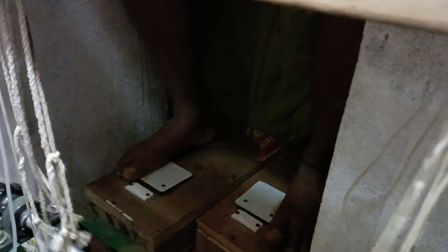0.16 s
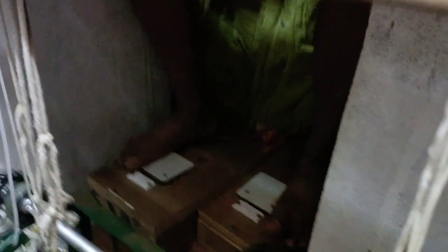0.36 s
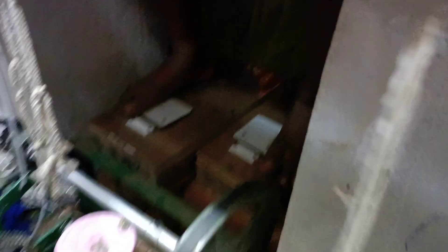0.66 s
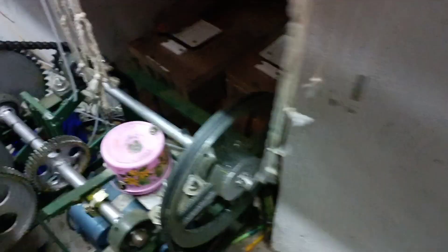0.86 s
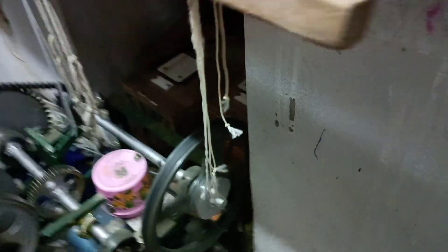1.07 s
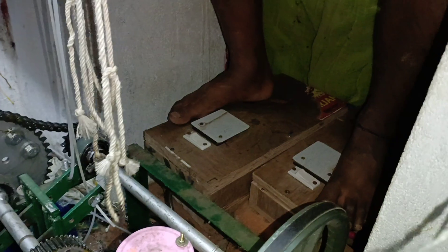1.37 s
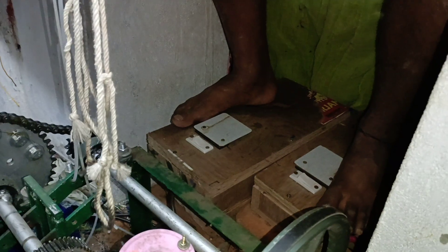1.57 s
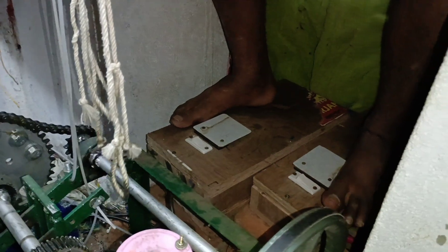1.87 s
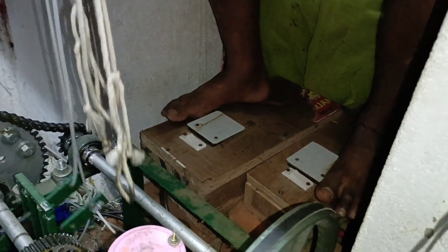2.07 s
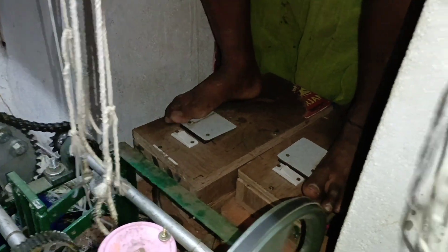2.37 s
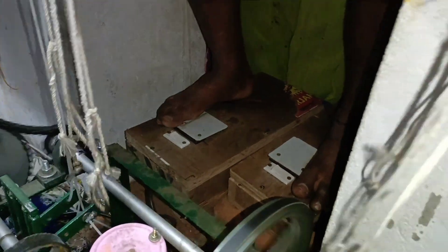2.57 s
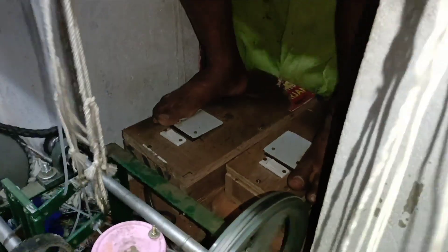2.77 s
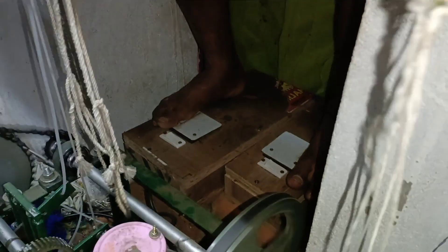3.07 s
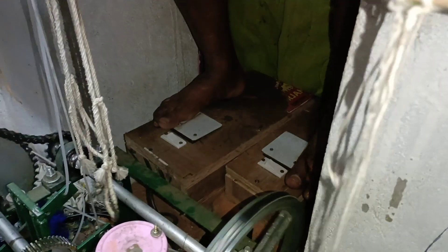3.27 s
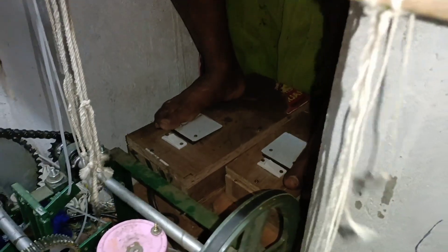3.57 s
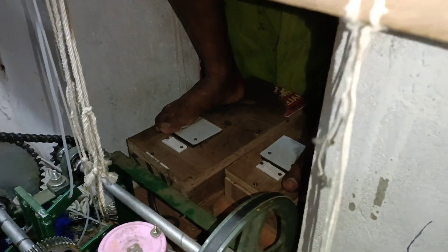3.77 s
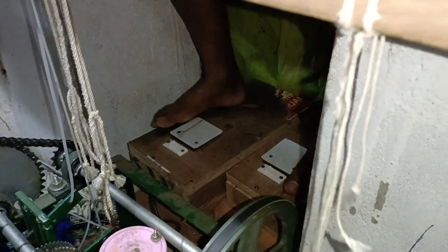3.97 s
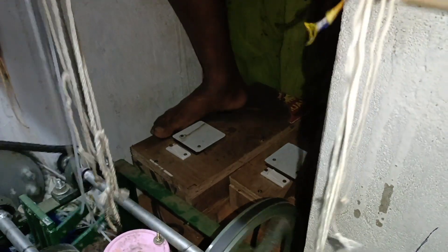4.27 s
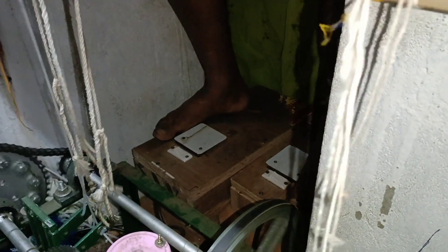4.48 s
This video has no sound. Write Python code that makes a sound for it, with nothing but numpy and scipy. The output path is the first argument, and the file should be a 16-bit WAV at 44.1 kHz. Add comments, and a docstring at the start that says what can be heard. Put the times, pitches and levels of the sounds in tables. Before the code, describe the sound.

Uneven wooden knocks from a foot-worked loom, heard very close with a short bright room echo. The first chain of clatter and hard blows is chopped off at an iron clack. Near silence holds a few tiny ticks, then rubbing and grinding swell, levers knock, and the second stroke lands, ending in clacks and a hissy scrape.

```python
"""A small hard-walled room, heard from close by: a wooden handloom is worked by its treadles.
A stroke is a chain of impacts: treadle clatter, latch, catch, batten blow and rebound, a pause, an iron clack.
The sound of the first stroke is cut off abruptly; near silence with faint ticks follows, then the loom runs up
with a long slide and makes a second stroke. Impacts excite decaying modes, gears grind under a varying load, cords
rub as friction noise and short thin tones squeak or ring. A look-ahead limiter ducks all around the hardest blows."""
import sys
import numpy as np
from scipy import signal
from scipy.io import wavfile
from scipy.ndimage import uniform_filter1d, minimum_filter1d

SR = 44100
rng = np.random.default_rng(int(sys.argv[2]) if len(sys.argv) > 2 else 0)


def store_pcm(level_fs):
    """Save levels as 16-bit WAV."""
    pcm = np.round(np.clip(level_fs, -1, 1) * 32767).astype(np.int16)
    wavfile.write(sys.argv[1], SR, np.atleast_2d(pcm).T)


N = 204359
TIME = np.arange(N) / SR  # s
BREAK_S = 1.398  # the sound of the first stroke, with all its echoes, is cut off here
FIRST_STROKE_S, SECOND_STROKE_S = 0, 2.985
HISS_DB, HISS_GROWTH = -7, 1.3  # cord hiss at a gear load of 0 dB, and dB of hiss per dB of load
GRIP_S = .018  # a rub takes this long to reach full pressure
TONE_SAG = .02  # share of its pitch that a thin tone loses as it runs
EDGE_HZ = 15750  # upper band limit

# Load on the loom through any one stroke.
# Each row: time into the stroke in seconds, load on the frame in dB, load on the gears in dB.
STROKE_LOAD = [(0, -35.5, -31), (.16, -28.5, -24.5), (.3, -28.5, -30), (.4, -45, -39.5), (.52, -35.5, -32),
               (.6, -38.5, -37), (.72, -40, -26.5), (.84, -42.5, -35.5), (1.06, -43.5, -36.5),
               (1.23, -35.5, -33.5), (1.41, -34, -24), (1.65, -32, -28)]
# Load from the near silence after the cut through the run-up to the second stroke.
# Each row: time in seconds, load on the frame in dB, load on the gears in dB.
RUN_UP_LOAD = [(1.41, -65, -64), (1.55, -45.5, -54.5), (1.71, -60, -66), (1.85, -46, -41),
               (2.0, -38, -24.5), (2.2, -32, -21), (2.58, -36, -34), (2.68, -30.5, -22.5),
               (2.77, -44, -29.5), (2.85, -28, -22.5)]
# Spectrum of the loaded frame's rumble. Each row: frequency in Hz, level in dB.
RUMBLE_SPECTRUM = [(25, -21), (40, -17), (58, 0.5), (100, -2.5), (170, 2.5), (212, -9.5), (245, -3.5),
                   (305, -5), (440, -10), (600, -28), (1000, -72)]
# Spectrum of the grinding gear teeth. Each row: frequency in Hz, level in dB.
GRIND_SPECTRUM = [(150, -12), (400, -1), (750, 4.5), (1300, -0.5), (2000, -2), (2800, -4.5), (3500, -15),
                  (5000, -26.5), (9000, -55)]
# Spectrum of the hissing cords. Each row: frequency in Hz, level in dB.
HISS_SPECTRUM = [(2000, -18.5), (4000, 0.5), (5500, -1), (7000, -1.5), (8700, 3), (10300, -6), (12500, -20),
                 (15500, -18)]
# Blows of the loom's parts. Each row: start in seconds, force in dB, treble tilt in dB, part struck.
BLOWS = [ (.094, -25, -2, "treadle"), (.113, -18, 1.5, "treadle"), (.142, -8, -.5, "treadle"),
         (.175, -7.5, -3, "treadle"), (.191, -13, 0, "treadle"), (.269, -12, 2.5, "latch"),
         (.3414, 3, 4, "catch"), (.626, -1.5, -4.5, "batten"), (.712, -11, -20, "rebound"),
         (.776, -19, -15, "rebound"), (.891, -28, -9, "batten"), (.918, -18.5, -7, "batten"),
         (1.2665, -32.5, 10, "clack"), (1.338, -10, 10, "clack"), (1.369, -19, -1, "clack"),
         (1.4272, -48.5, 4, "fitting"), (1.506, -40.5, 10, "fitting"), (1.554, -41, 7, "fitting"),
         (1.7348, -51, -1, "fitting"), (1.767, -34.5, -1, "fitting"), (2.448, -22.5, -8, "latch"),
         (2.493, -24, 3, "latch"), (2.6243, -20.5, -19, "rebound"), (2.644, -7, -5, "pawl"),
         (2.801, -15, 0.5, "lever"), (2.808, -10.5, 0.5, "lever"), (2.837, -13, -1, "lever"),
         (2.951, -27.5, 3, "fitting"), (2.976, -20, -8, "box"), (3.117, -7.5, -4.5, "treadle"),
         (3.162, -11.5, -1, "treadle"), (3.2551, -9.5, -2, "latch"), (3.333, 3.5, 3.5, "catch"),
         (3.6075, -2, 2.5, "batten"), (3.689, -7.5, -13, "rebound"), (3.904, -25.5, 0, "batten"),
         (3.9157, -17, -14, "batten"), (4.329, -19, -9, "rebound"), (4.3435, -9.5, 7.5, "clack"),
         (4.415, -11.5, 2.5, "box"), (4.612, -14.5, -6, "latch")]
# How each struck part sounds. Each entry: bass tilt in dB, clatter time in seconds, room level in dB,
# iron ring in dB, own note in Hz, level of that note in dB.
STRUCK_PARTS = {"treadle": (2, .0058, 0.5, -5, 1640, -6), "latch": (-8, .003, 5.5, -12, 2170, -4),
                "catch": (-6, .0023, 1.3, -15, 1850, -9), "batten": (-5, .0095, 2, -28, 1160, -3.5),
                "rebound": (-4, .007, -2, -22, 1580, -4), "clack": (-3, .0085, 0.5, -5, 3160, -6),
                "fitting": (-7, .003, 2, -5, 2400, 3), "pawl": (-1, .013, -14, -16, 3450, -7),
                "lever": (3, .004, 3.5, 1.5, 1880, -6), "box": (7, .007, -10, -12, 340, -6)}
# Response of the wood. Each row: frequency in Hz, level in dB.
WOOD_RESPONSE = [(30, -44), (130, -21), (300, -4.5), (600, -3.5), (1000, -2), (1700, 1), (2800, 0.5),
                 (3600, -8.5), (4600, -12), (6200, -10), (8400, -10.5), (10300, -20.5), (12500, -30),
                 (15500, -37.5)]
# Modes of the frame. Each row: frequency in Hz, level before scatter in dB, 60 dB decay time in seconds.
FRAME_MODES = [(179, -7.5, 0.077), (234, -17, 0.097), (351, 0.5, 0.14), (865, 15, .09), (1186, 11, 0.088),
               (1540, 7.5, .1), (1840, 16, 0.063), (2760, -10, 0.12), (2993, 16, 0.08), (3500, 7, 0.14),
               (3750, -4, 0.059), (6430, -3.5, .09), (7650, -24, .08), (8500, -60, .08)]
# Modes of the iron fittings. Each row: frequency in Hz, level before scatter in dB, 60 dB decay time in seconds.
IRON_MODES = [(1025, -6, 0.19), (2210, -4, 0.21), (2556, -1.5, 0.62), (2760, 4, .22), (3230, -26, 0.072),
              (3350, 3, 0.11), (4080, 7, 0.06), (5330, -2, .26), (5500, -1, .22), (5400, -8, 0.12),
              (6050, -4, .15), (7100, -7.5, .24), (7100, -8, 0.35), (9120, -20.5, .2), (10700, -38.5, .18)]
# Close modes of a struck part.
# Each row: multiple of its own note, level before scatter in dB, 60 dB decay time in seconds.
NOTE_MODES = [(.965, -6.5, 0.071), (1, -1, .12), (1.04, -1, 0.083)]
# Decay of the room. Each row: frequency in Hz, 60 dB decay time in seconds.
ROOM_DECAY = [(100, 0.22), (500, 0.34), (1500, 0.47), (3000, 0.44), (8000, 0.27), (15000, 0.3)]
# Booms of the treadles and their box under the feet.
# Each row: start in seconds, mean frequency in Hz, level in dB, swell time in seconds.
BOOMS = [(.134, 181, -24.5, .043), (.2, 247, -31.5, .024), (.224, 129, -29, .036), (.519, 130, -31, .027),
         (.555, 73.4, -34, .025), (1.472, 165, -41.5, .028), (2.57, 58.7, -28, .035),
         (2.811, 144, -27.5, .013), (3.105, 426, -26, .031), (3.136, 360, -24, .021),
         (3.15, 243.4, -24.5, .021), (3.165, 130.6, -27, .043), (3.264, 67.6, -28, .014),
         (3.615, 245, -27, .012), (4.4, 339, -17, .01)]
# Cords and sliding wood.
# Each row: start in seconds, time under pressure in seconds, fade time in seconds, level in dB, treble tilt in dB.
RUB_EVENTS = [(.2, .035, .015, -34, 7), (.48, .05, .04, -28, 1), (1.12, .04, .05, -43, 9),
              (1.4, .1, .03, -57, 5), (1.499, .08, .015, -47.5, 9), (1.907, .11, .04, -27, 3),
              (2.021, .07, .04, -22.5, 2), (2.118, .13, .135, -21.5, 6.5), (2.149, .065, .025, -16.5, 7.5),
              (3.065, .035, .025, -24.5, 1), (3.133, .03, .03, -27, 6), (.63, .07, .04, -33, 7),
              (3.48, .06, .05, -36, 4), (4.121, .03, .015, -35.5, 7.5), (4.177, .02, .015, -32.5, 4),
              (4.389, .035, .015, -19.5, 3), (4.438, .05, .025, -13, 8.5), (4.53, .1, .05, -26.5, 6)]
# Colour of sliding contact. Each row: frequency in Hz, level in dB.
SLIDING_COLOUR = [(250, 2.5), (1000, 1.5), (3000, 4.5), (5600, -3), (8400, -0.5), (12000, 5.5), (15500, 9)]
# Short thin tones, squeaking or ringing. Each row: start in seconds, length in seconds, starting pitch in Hz,
# level in dB, unsteadiness as a share of pitch.
THIN_TONES = [(.498, .042, 8800, -30, .063), (.575, .066, 11800, -35.5, .044),
              (.906, .026, 7950, -34, .025), (1.91, .039, 9200, -34, .042), (3.008, .038, 9250, -44, .004),
              (3.112, .034, 1625, -17.5, .013), (3.274, .033, 1210, -21, .022),
              (3.566, .11, 11750, -37, .057), (3.617, .028, 8350, -12, .025),
              (3.902, .02, 7850, -31.5, .027), (4.125, .02, 7850, -33.5, .017),
              (4.18, .016, 7600, -32, .035)]


def amp(db):
    """Level to gain: twenty decibels are a factor of ten in amplitude."""
    return 10 ** (np.asarray(db) / 20)


def evened(x):
    """Normalisation of a steady signal: scales to rms 1."""
    return x / np.sqrt(np.mean(x ** 2) + 1e-20)


def unit(x):
    """Normalisation of a transient: scales to energy 1."""
    return x / (np.linalg.norm(x) + 1e-12)


def read(points, hz):
    """Interpolation on a pitch scale: joins points by straight lines over log frequency."""
    f, value = np.transpose(points)
    return np.interp(np.log(hz + 1), np.log(f + 1), value)


def add(mix, s, sound):
    """Superposition: adds a sound at time s; whatever began before the break ends there."""
    end = round(BREAK_S * SR) if s < BREAK_S else N
    part = mix[max(round(s * SR), 0):end][:len(sound)]
    part += sound[:len(part)]


def colour(x, *spectra, size=4096):
    """Minimum phase: a causal filter of energy 1 whose dB curve is the sum of the spectra."""
    hz = abs(np.fft.fftfreq(size, 1 / SR))
    gain_db = sum(read(points, hz) for points in spectra)
    log_gain = np.log(amp(gain_db))
    spectrum = np.exp(np.conj(signal.hilbert(log_gain)))  # the log gain fixes the phase
    taps = np.fft.ifft(spectrum).real
    return signal.fftconvolve(x, unit(taps[:size // 2]))[:len(x)]


def grains(count, spread_db):
    """Granular contact: dense tiny touches, a few much larger than the rest."""
    push = rng.standard_normal(count)
    touching = rng.random(count) < .25
    size = np.minimum(rng.exponential(1, count), 4)
    return evened(push * touching * amp(spread_db * size))


def wander(x, patchy_db=3.2):
    """Moving excitation: a travelling contact wakes one narrow resonance after another."""
    z = signal.stft(x, SR, nperseg=1024, noverlap=768)[2]
    across_hz = uniform_filter1d(rng.standard_normal(z.shape), size=4, axis=0)
    patches = evened(uniform_filter1d(across_hz, size=6, axis=1))  # smoothed over time too
    moved = signal.istft(z * amp(patchy_db * patches), SR, nperseg=1024, noverlap=768)[1]
    return evened(moved[:len(x)])


def stroke_at(start):
    """Time shift: the load curve of a stroke that begins at this time."""
    return [(start + s, frame_db, gear_db) for s, frame_db, gear_db in STROKE_LOAD]


def mechanism():
    """Friction under load: the frame rumbles, gear teeth grind unevenly and cords hiss along with the gears."""
    out = np.zeros(N)
    spans = ((stroke_at(FIRST_STROKE_S), 0, BREAK_S),
             (RUN_UP_LOAD + stroke_at(SECOND_STROKE_S), BREAK_S, N / SR))
    for load, start, stop in spans:
        t = TIME[round(start * SR):round(stop * SR)]
        s, frame_load, gear_load = np.transpose(load)
        frame_db = np.interp(t, s, frame_load)
        gear_db = np.interp(t, s, gear_load)
        rumble = amp(frame_db) * colour(rng.standard_normal(len(t)), RUMBLE_SPECTRUM, size=8192)
        teeth = wander(grains(len(t), spread_db=2.0), patchy_db=3.5)
        grind = amp(gear_db) * colour(teeth, GRIND_SPECTRUM)
        cords = wander(grains(len(t), spread_db=2), patchy_db=5)
        hiss = amp(HISS_DB + HISS_GROWTH * gear_db) * colour(cords, HISS_SPECTRUM)
        add(out, start, rumble + grind + hiss)
    return out


def tilt(bass_db, treble_db):
    """Contact stiffness: heavy contacts add bass, hard contacts add treble."""
    return [(250, bass_db), (1000, 0), (2600, 0), (5000, treble_db), (14000, 2.12 * treble_db)]


def ring(modes, t, scatter_db):
    """Modal decay: each blow lands elsewhere and shares its energy out differently among the modes."""
    hz, db, t60 = np.transpose(modes)[:, :, None]
    weight, detune, start = rng.standard_normal((3, len(modes), 1))
    swing = np.sin(2 * np.pi * (hz * (1 + 0.0035 * detune) * t + start))
    decay = np.exp(-np.log(1000) * t / t60)
    return unit((amp(db + scatter_db * weight) * decay * swing).sum(0))


def room(count, build_s=0.0031):
    """Diffuse reverberation: dense reflections build up quickly, then each band dies at its own rate."""
    hz, t, z = signal.stft(rng.standard_normal(count), SR, nperseg=256)
    decay = np.exp(-np.log(1000) * t / read(ROOM_DECAY, hz)[:, None])
    tail = signal.istft(z * decay, SR, nperseg=256)[1][:count]
    return unit(tail * (1 - np.exp(-TIME[:count] / build_s)))


def contact(note_hz, note_db=4.5, note_width=0.16, uneven_db=4):
    """Point of excitation: the part favours the region of its note, the place of the blow some overtones."""
    hz = np.geomspace(100, 16000, num=170)
    note = note_db * np.exp(-(np.log(hz / note_hz) / note_width) ** 2)
    return np.transpose([hz, note + uneven_db * rng.standard_normal(len(hz))])


def knocks(frame_db=-7, bite=0.1, crack=0.18):
    """Impact excitation: each blow is a burst of chatter in loose joints; frame, fittings and room ring on."""
    out, t = np.zeros(N), TIME[:SR * 2 // 3]
    for s, db, treble_db, part in BLOWS:
        bass_db, clatter_s, room_db, iron_db, note_hz, note_db = STRUCK_PARTS[part]
        grip = 1 - np.exp(-t / (bite * clatter_s))  # loose parts take up their play gradually
        chatter = unit(grains(len(t), spread_db=4.0) * grip * np.exp(-t / clatter_s))
        chatter[0] += crack  # the first touch
        place = contact(note_hz)
        direct = colour(chatter, WOOD_RESPONSE, place, tilt(bass_db, treble_db + 2.5))
        # the place colours the echo less
        echo = colour(room(len(t)), WOOD_RESPONSE, place * [1, .7], tilt(bass_db, treble_db))
        own_modes = np.multiply(NOTE_MODES, [note_hz, 1, 1])
        rings = amp(frame_db) * ring(FRAME_MODES, t, scatter_db=5.5)
        rings += amp(iron_db) * ring(IRON_MODES, t, scatter_db=1.5)
        rings += amp(note_db) * ring(own_modes, t, scatter_db=1.0)
        strength = amp(db) * np.sqrt(clatter_s * SR / 2)  # longer chatter puts in more energy
        add(out, s, strength * (unit(direct) + rings + amp(room_db) * echo))
    return out


def thuds():
    """Low-mode excitation: a soft push swells one low mode of the boards, which wobbles and dies."""
    out, t = np.zeros(N), TIME[:SR // 3]
    for s, hz, db, swell_s in BOOMS:
        wobble = evened(uniform_filter1d(rng.standard_normal(len(t)), size=400))
        swing = np.sin(2 * np.pi * np.cumsum(hz * (1 + 0.043 * wobble)) / SR)
        swell = t / swell_s * np.exp(1 - t / swell_s)  # peaks at 1 after the swell time
        add(out, s, amp(db) * swell * swing)
    return out


def rubs(wetness=0.48, flutter_db=1.2):
    """Stick-slip friction: fine grains in the wood, as the pressure builds, holds and fades."""
    out, t = np.zeros(N), TIME[:SR * 2 // 3]
    for s, hold_s, fade_s, db, treble_db in RUB_EVENTS:
        pressure = np.minimum(t / GRIP_S, 1) * np.exp(-np.maximum(t - hold_s, 0) / fade_s)
        slips = grains(len(t), spread_db=1.6)
        # the grip is uneven
        flutter = flutter_db * evened(uniform_filter1d(rng.standard_normal(len(t)), size=400))
        rub = pressure * amp(flutter) * wander(slips, patchy_db=3.0)
        echo = signal.fftconvolve(rub, room(len(t)))[:len(t)]
        wet = rub + wetness * echo
        add(out, s, amp(db) * colour(wet, WOOD_RESPONSE, SLIDING_COLOUR, tilt(0, treble_db)))
    return out


def thin_tones():
    """Frequency modulation: short thin tones, squeaking or ringing, waver in pitch and sag a little."""
    out, t = np.zeros(N), TIME[:SR // 3]
    for s, length_s, pitch_hz, db, waver in THIN_TONES:
        jitter = evened(uniform_filter1d(rng.standard_normal(len(t)), size=60))
        progress = np.minimum(t / length_s, 1)
        hz = pitch_hz * (1 - TONE_SAG * progress) * (1 + waver * jitter)
        swell = np.sqrt(abs(np.sin(np.pi * progress)))
        tone = np.sin(2 * np.pi * np.cumsum(hz) / SR) * swell
        echo = signal.fftconvolve(tone, room(len(t)))[:len(t)]
        add(out, s, amp(db) * (tone + 0.13 * echo))
    return out


def scene():
    """Linear superposition: all parts of the loom, heard from one place."""
    return (mechanism() + knocks() + thuds() + rubs() + thin_tones())[None]


def record(dry, limit_db=-10.5, ahead_s=0.024, recovery_db=75):
    """Gain control: a limiter ducks ahead of loud blows and recovers by recovery_db a second; then filters, soft clip."""
    power_db = 10 * np.log10(abs(uniform_filter1d(dry[0] ** 2, size=220)) + 1e-12)
    reach = max(round(ahead_s * SR), 2)
    coming_db = -minimum_filter1d(-power_db, reach, origin=-(reach // 2))  # loudest level just ahead
    fall = recovery_db * TIME
    held_db = np.maximum.accumulate(coming_db + fall) - fall  # rises at once, falls steadily
    over_db = np.maximum(held_db - limit_db, 0)
    ducked = dry / amp(uniform_filter1d(over_db, size=400))
    low_cut = signal.butter(3, 42, "highpass", fs=SR, output="sos")
    ducked = signal.sosfilt(low_cut, ducked)
    rounded = ducked / (1 + (ducked / .86) ** 6) ** (1 / 6)  # soft clip towards .86
    band_limit = signal.firwin(401, EDGE_HZ, window=("kaiser", 9), fs=SR)
    return signal.oaconvolve(rounded, band_limit[None], "same")


dry = scene()
out = record(dry)
store_pcm(out)
```